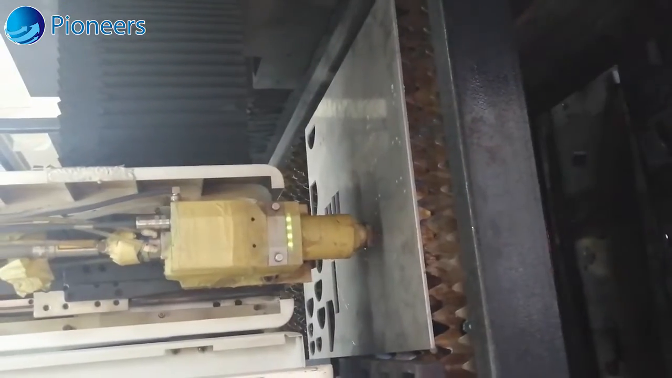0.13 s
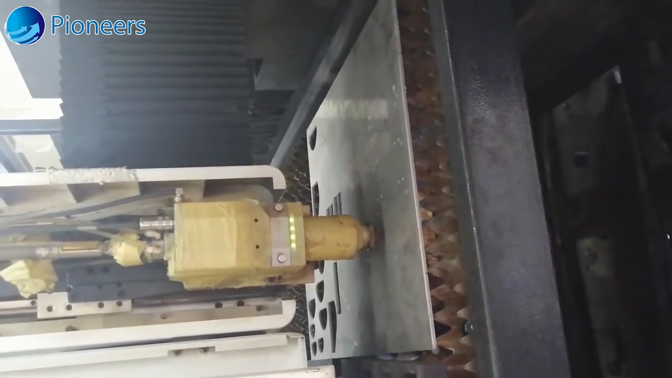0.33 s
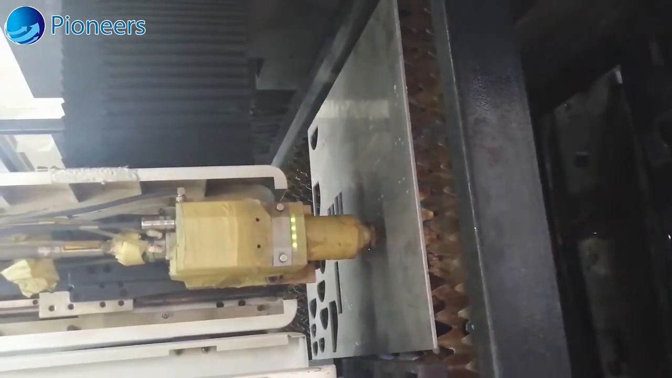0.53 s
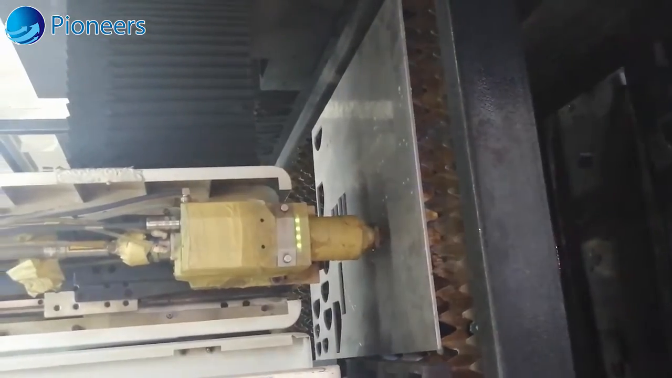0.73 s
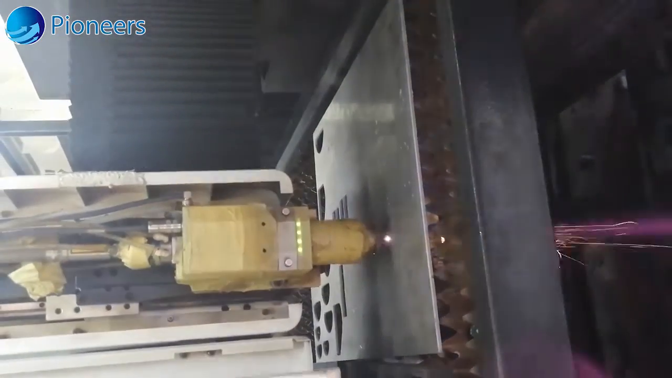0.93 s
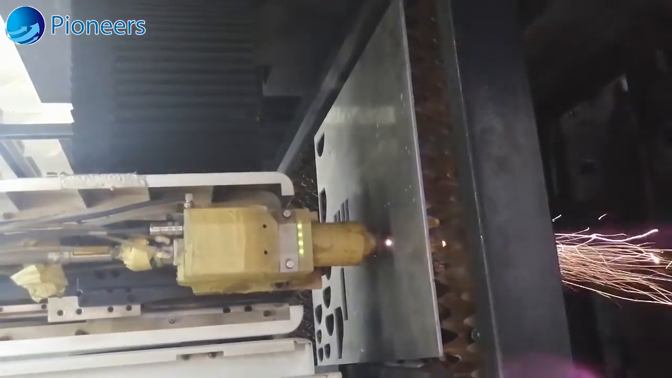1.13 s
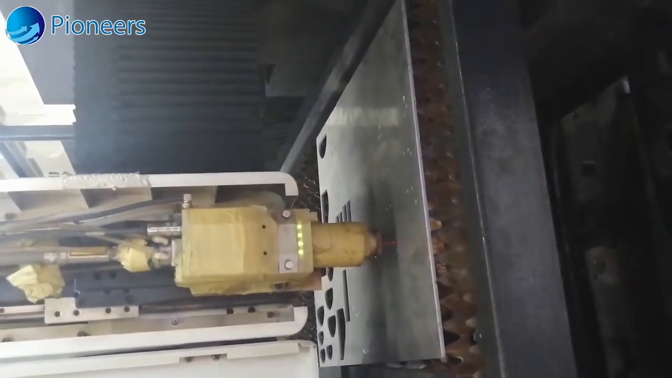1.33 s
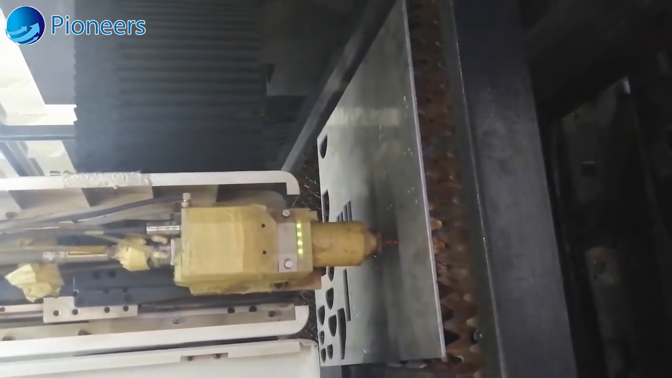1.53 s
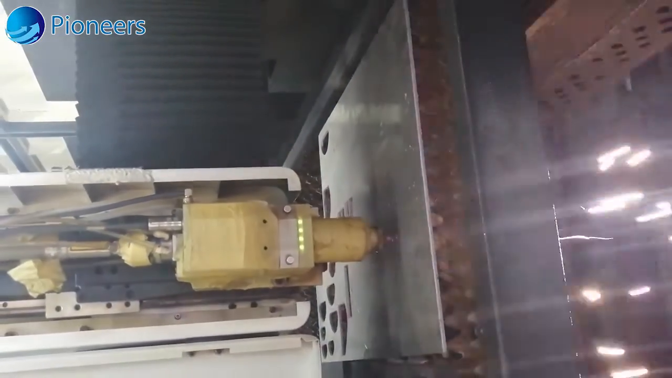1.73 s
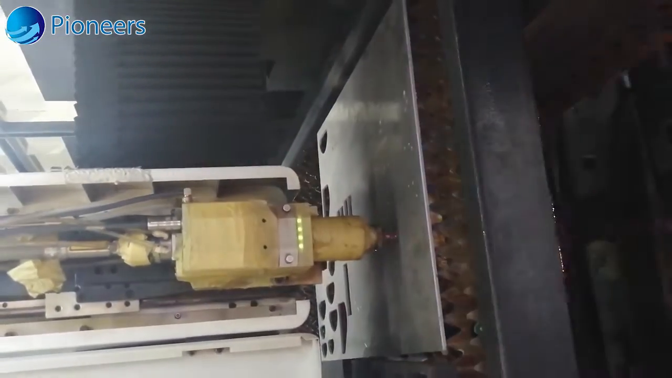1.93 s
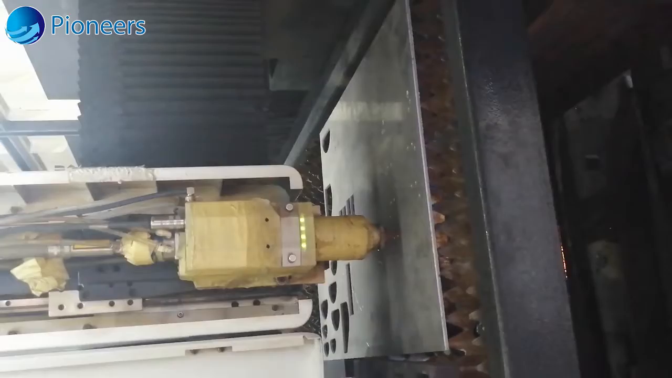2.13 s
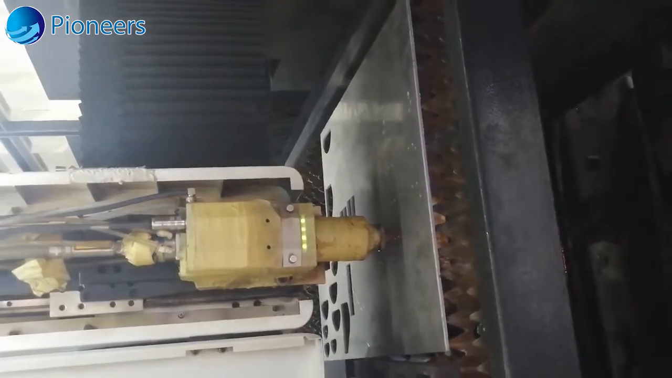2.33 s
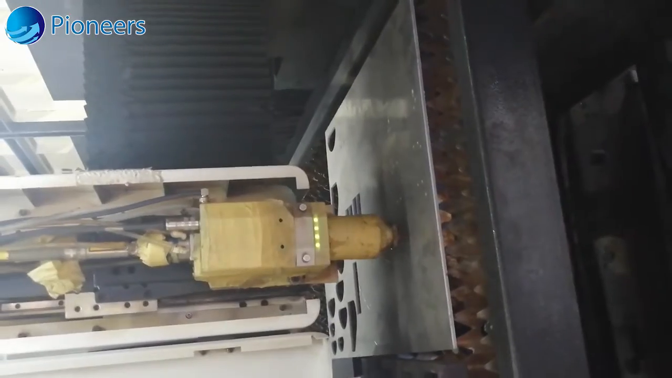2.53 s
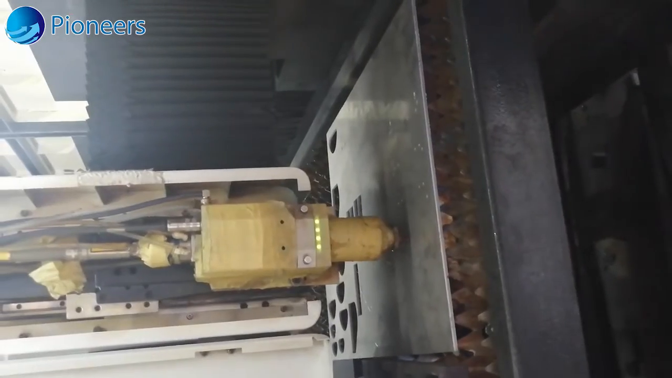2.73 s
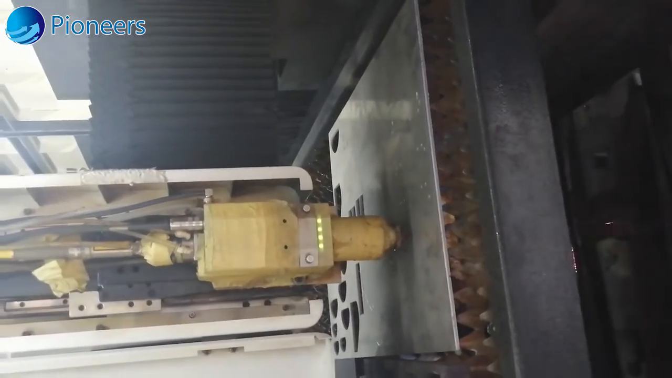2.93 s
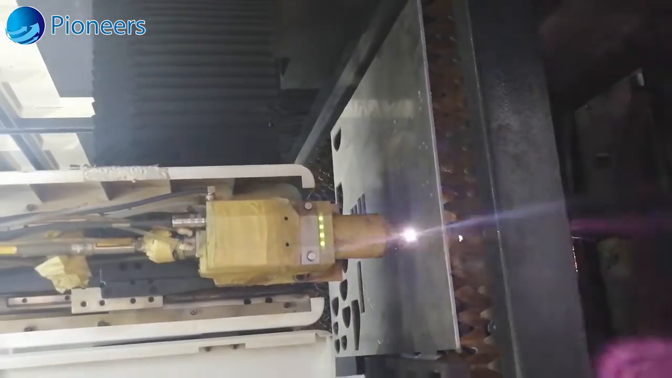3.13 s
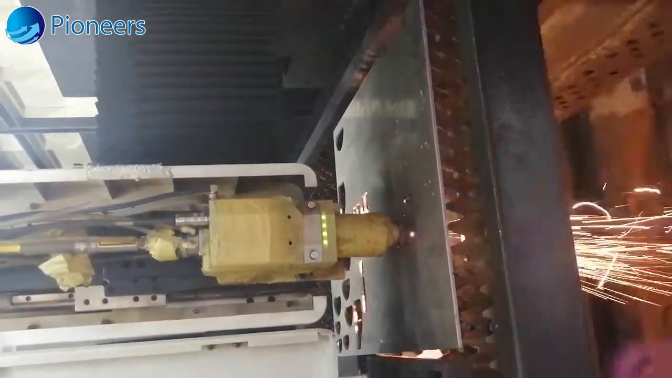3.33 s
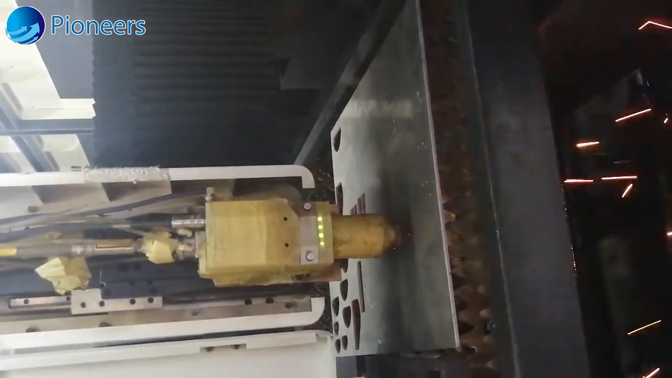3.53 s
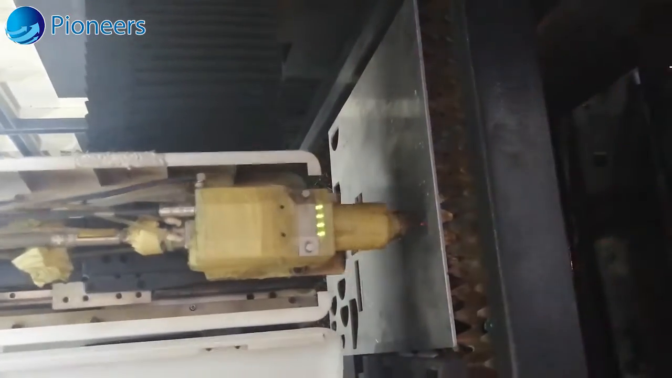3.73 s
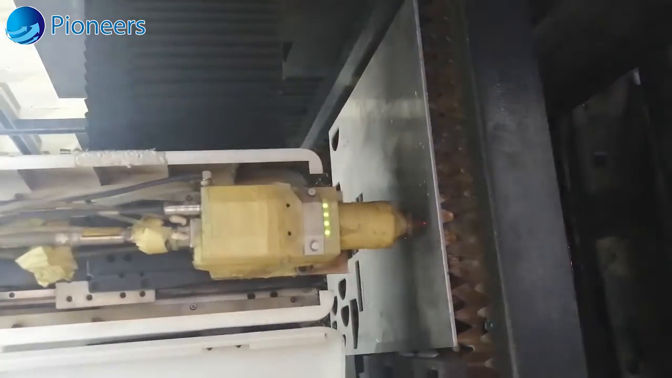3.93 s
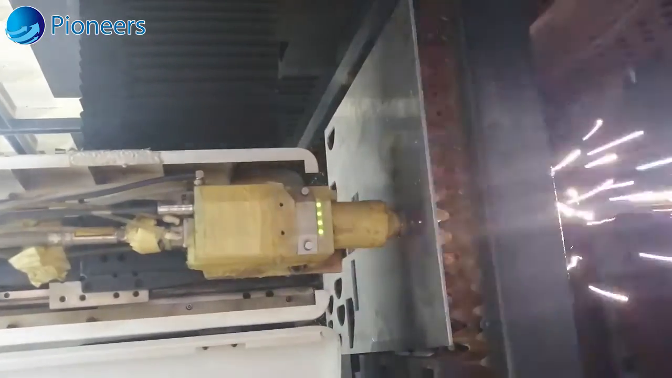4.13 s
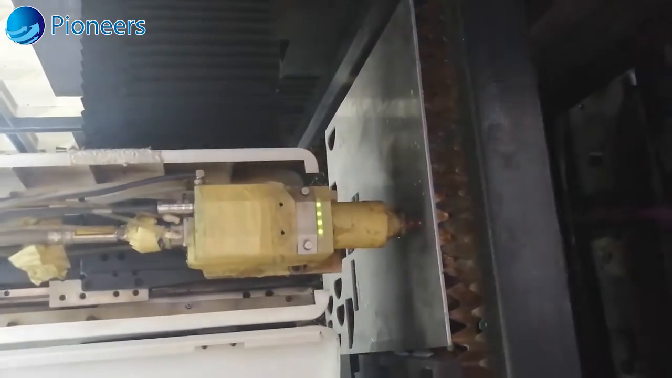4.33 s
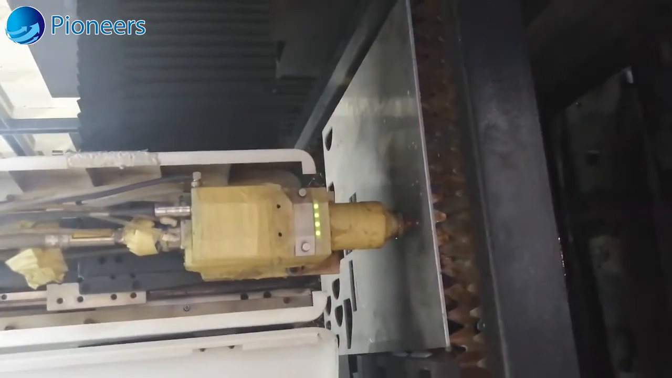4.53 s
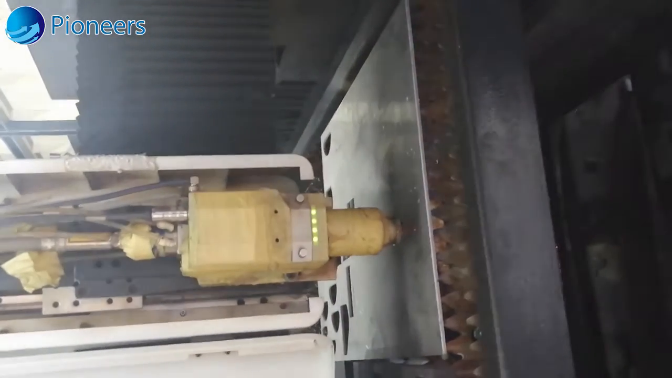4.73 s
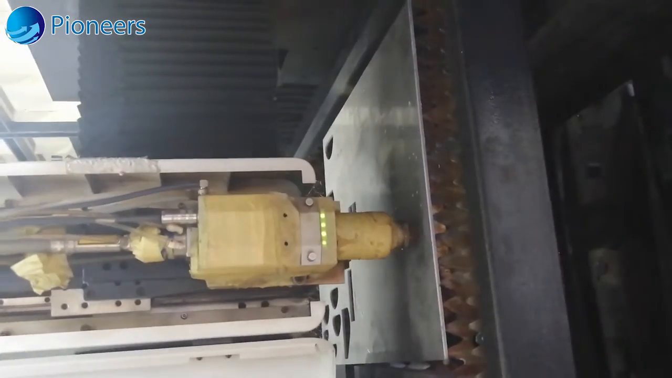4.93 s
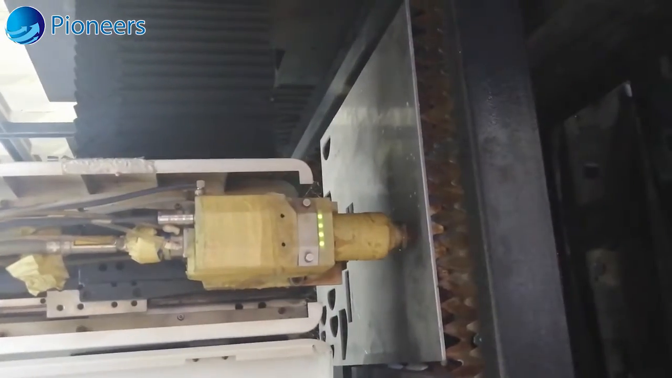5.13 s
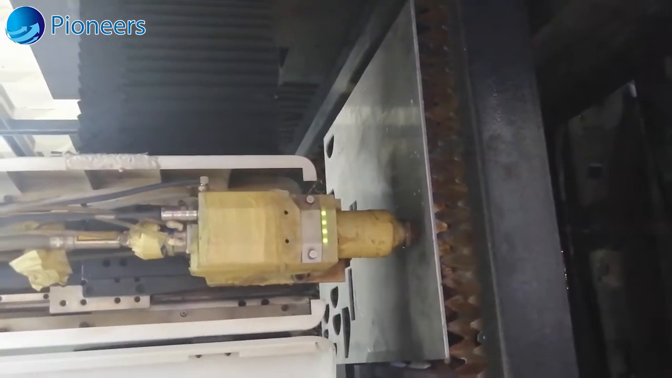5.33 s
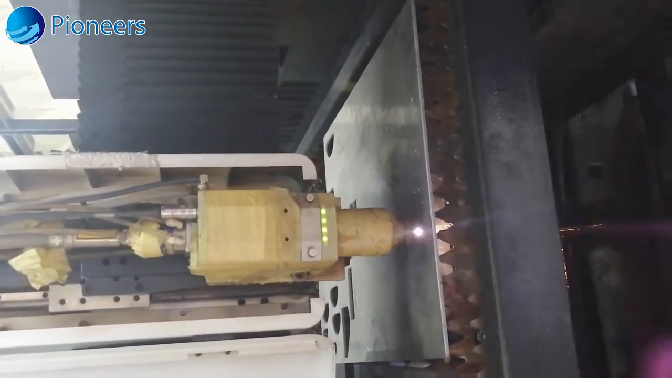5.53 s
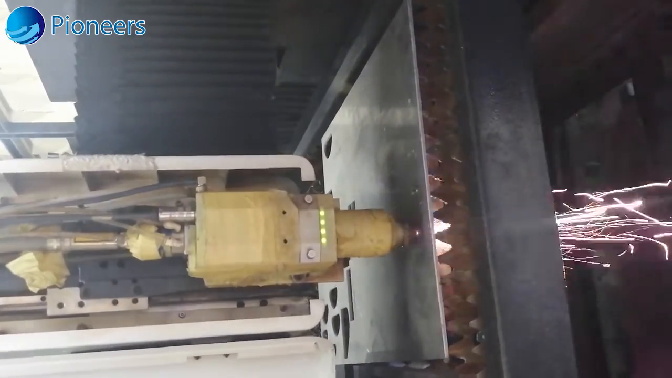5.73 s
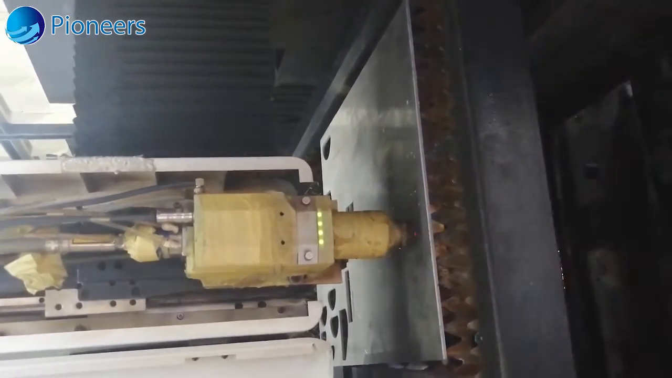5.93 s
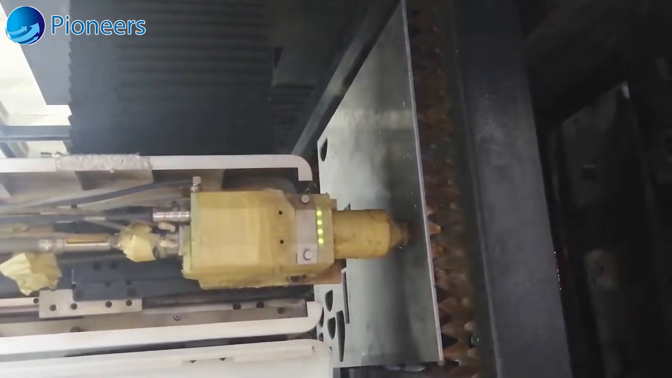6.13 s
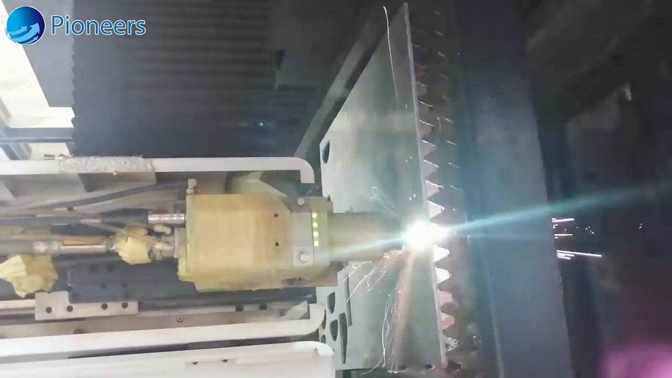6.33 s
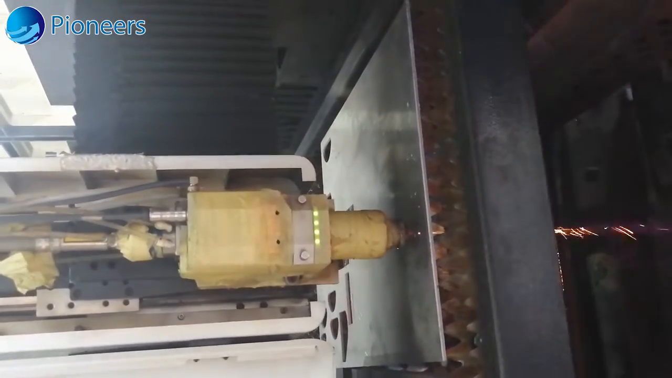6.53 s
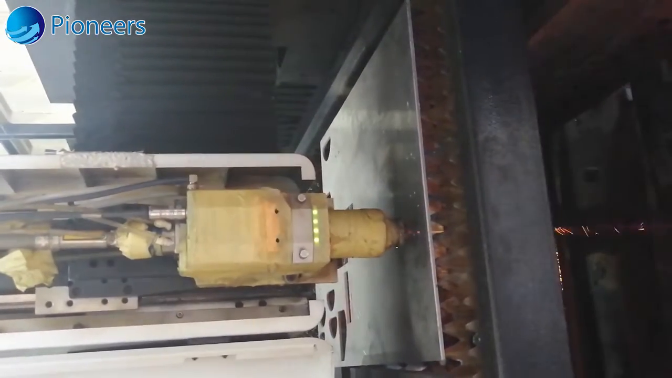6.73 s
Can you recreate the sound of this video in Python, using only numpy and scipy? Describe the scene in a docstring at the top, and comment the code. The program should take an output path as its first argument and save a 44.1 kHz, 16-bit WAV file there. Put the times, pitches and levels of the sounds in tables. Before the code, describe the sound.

Close stereo sound of a laser cutting steel sheet in a workshop: bright turbulent gas hiss, stronger on the right, over a low fan-like drone and faint hollow ringing. A sputtering cut is ending at the start; at 0.15 s the gas sinks, then returns by 0.3. Two sharp cracks about 0.09 s apart hit at 0.83 with a high fading whine. A mild blast at 1.2 clears the hole, the gas dips at 1.4, and from 1.5 the hissing cut sputters finely, with pops at 1.63, 2.04 and 2.2. The gas drops at 2.4 and returns; cracks and whine come at 3.08, the strongest, longest roar at 3.43-3.6, a dip at 3.75, then cutting from 3.9. It softens at 4.85, cracks and whines at 5.51, blasts at 5.87 with a tiny whine, dips at 6.1, and cuts from 6.2 to the end with hollow singing.

```python
"""A steady gas hiss, stronger on the right, over a low machine drone: a fibre laser cuts steel sheet, heard close by.
Three holes run the same cycle: the gas sinks as the head lifts and comes back as it hovers, a whine and two cracks
mark the pierce, a blast clears the hole, the gas dips briefly, and the cut runs on with a fine sputter and a few pops.
Hiss, drone and hollow rings are shaped noise; blasts and sputter are random pressure spikes over low noise;
the whine is three roughened harmonics of the laser's pulse rate."""
import sys
import numpy as np
from scipy import signal
from scipy.fft import rfft, irfft
from scipy.io import wavfile
from scipy.ndimage import uniform_filter1d

SR = 44100
rng = np.random.default_rng(int(sys.argv[2]) if len(sys.argv) > 2 else 0)


def master_out(mix):
    """Clip the mix to full scale and print it as 16-bit PCM to the path in sys.argv[1]."""
    frames = np.transpose(np.atleast_2d(mix))
    ceiling = np.clip(frames, -1, 1)
    pcm = np.round(ceiling * 32767).astype(np.int16)
    wavfile.write(sys.argv[1], SR, pcm)


N = 299439
TIME = np.arange(N) / SR  # s
FREQS = np.fft.rfftfreq(N, 1 / SR)  # Hz

# All table levels are relative: scene() trims each layer into the mix.
# The work cycle, one row a hole: lift_s, pierce_s, blast_start_s, blast_end_s, gas_shut_s, cut_s, blast_db,
# extra_hover_hiss_db, extra_raised_body_db, extra_cut_hiss_db, extra_cut_sputter_db
HOLES = [(0.14, 0.829, 1.189, 1.29, 1.383, 1.482, -33, 0, 0, -0.45, 2.5),
         (2.385, 3.083, 3.434, 3.585, 3.74, 3.914, -22.5, -1.6, 4, 0.25, -1),
         (4.85, 5.512, 5.873, 6.003, 6.1, 6.19, -30.5, 0.7, -0.6, 0.2, 0.2)]
# Gas and melt in each named stage: settling_s, hiss_db, body_over_hiss_db, bed_ring_db, sputter_db
STAGES = {"lift": (0.16, -49.5, 0.5, -58, -86), "hover": (0.055, -41.1, 1.66, -49.2, -85),
          "pierce": (0.02, -39.8, 3.7, -51, -85), "rest": (0.025, -43.4, 4.3, -50, -85),
          "blast": (0.031, -32.4, 0.3, -53, -60), "ease": (0.01, -40.4, 2.5, -53.5, -57),
          "shut": (0.19, -61.5, 2.5, -79, -130), "cut": (0.013, -37.6, 1.1, -51, -51.5)}
# Two cracks of every pierce and the weak roar between them: delay_s, length_s, level_db
CRACKS = [(0, 0.027, -24), (0.034, 0.048, -41), (0.087, 0.043, -24.5)]
# Crack outside that pattern: start_s, length_s, level_db
STRAY_CRACKS = [(3.146, 0.016, -28.5)]
# Bursts of the pulsed beam: start_s, length_s, whine_db, overtones_db
WHINES = [(0.829, 0.11, -35.5, -28.5), (3.082, 0.18, -30.8, -34), (5.513, 0.125, -30, -31.5),
          (5.866, 0.02, -34, -44)]
# Single pops of the melt: start_s, peak_db, width_s
POPS = [(1.343, -25.5, 0.00088), (1.3889, -16.5, 0.0012), (1.629, -21, 0.00069), (2.044, -18.5, 0.00077),
        (2.204, -16, 0.00051), (3.670, -26, 0.00061), (3.734, -24, .0007), (6.096, -30, .0012)]
# Hollow singing of gas in the kerf: start_s, end_s, level_db
KERF = [(3.47, 3.66, -43), (6.2, 6.9, -44)]
# Resonances of the kerf: centre_hz, width_hz, level_db
KERF_MODES = [(2470, 330, 1), (2760, 410, -7), (3250, 340, -3)]
# How strongly the jet stirs the hollow bed as the head moves along: time_s, level_db
BED = [(0, -6.5), (2.2, -7), (2.8, -2), (4.1, 2.1), (6.79, 1.2)]
# Resonances of the bed under the sheet: centre_hz, width_hz, level_db
BED_MODES = [(737, 62, -3.5), (910, 78, 1.5), (1068, 51, 2.5), (1220, 110, 1.5), (1735, 34, -2.5),
             (2120, 1300, -6)]
# Colour of the jet on either side: freq_hz, left_db_per_hz, right_db_per_hz
HISS = [(500, -39.5, -27), (1980, -24.5, -22.5), (3130, -20, -18), (3860, -21.5, -21.5), (4307, -23, -15.5),
        (5200, -14, -0.84), (6070, -15, 1), (7080, -9.5, -5.5), (8350, -7, -12), (9900, -12.5, -11),
        (12400, -14.5, -8), (13800, -19.5, -10.5), (14920, -12, 0.5), (15570, -23, -16)]
# Peaks and hollows that head and sheet give the hiss: centre_hz, width_hz, level_db
HISS_PEAKS = [(3920, 350, -1.5), (5350, 120, 1.5), (5610, 290, -2.5), (5790, 120, 3), (6080, 100, 2),
              (7700, 280, -2.5), (10050, 240, 4), (10750, 400, -1), (15800, 260, 5)]
# Colour of the machine drone: freq_hz, level_db_per_hz
DRONE = [(20, -10), (45, -4), (90, -2), (180, 2), (290, -6), (410, -2), (650, -7), (1050, -11.5),
         (1450, -17), (3000, -36), (6000, -23)]
# Wavering hum lines of the machine: pitch_hz, rms_db
HUM = [(47, -62.5), (419, -71.5), (1960, -70.5)]

LIFT_S, PIERCE_S = 0.13, 0.145  # length of the lift and of the pierce
BLAST_LEAD_S = 0.049  # the gas builds up before the blast
MELT_LAG_S = 0.02  # added to the settling time of the melt
# a harder blast hisses louder and thinner (shares in dB per dB above the usual blast)
USUAL_BLAST_DB, BLAST_HISS_SHARE, BLAST_BODY_SHARE = -28.5, 0.33, -0.17
PULSE_HZ = 5000  # pulse rate of the beam, the pitch of the whine
WHINE_FADE_DB_PER_S, OVERTONE_FADE_DB_PER_S = 47, 60
THIRD_DB = -3  # third harmonic against the second
BODY_TOP_HZ = 7400  # splits the hiss into body and top
EDGE_HZ = 15790  # upper band limit of the recorder


def amp(db):
    """Decibels to gain."""
    return 10 ** (np.asarray(db) / 20)


def unit(x):
    """Scales to rms 1, over both sides together."""
    return x / np.sqrt(np.mean(abs(x) ** 2) + 1e-20)


def read(hz, values, at=FREQS):
    """Joins spectrum points by straight lines on a log-frequency axis."""
    return np.interp(np.log(at + 1), np.log(np.asarray(hz) + 1), values)


def noise(gain):
    """Noise of the given spectrum, unrelated on the two sides."""
    white = rng.standard_normal((2, N))
    return unit(irfft(rfft(white) * gain, N))


def wobble(rate_hz):
    """Smooth random drift on each side, up to about the given rate."""
    return noise(1 / (1 + (FREQS / rate_hz) ** 4))


def since(start):
    """Seconds gone by since a moment, zero before it."""
    return np.maximum(TIME - start, 0)


def fade_in(start, edge):
    """Straight ramp from 0 to 1, centred on the start."""
    return np.clip((TIME - start) / edge + .5, 0, 1)


def gate(start, end, edge):
    """Opens and shuts with soft edges."""
    return fade_in(start, edge) * np.clip((end - TIME) / edge + .5, 0, 1)


def bursts(rows, attack, release):
    """Level of bursts (start_s, length_s, level_db): each starts hard, holds and dies quickly."""
    return sum(amp(db) * fade_in(start, attack) * np.exp(-since(start + length) / release)
               for start, length, db in rows)


def resonances(modes):
    """Spectrum of a few resonances, each a bell-shaped peak."""
    return sum(amp(db) / (1 + ((FREQS - hz) / (width / 2)) ** 2) for hz, width, db in modes)


def to_right(left_db):
    """Gains of a source that is weaker on the left."""
    return amp([[left_db], [0]])


def recoil(x, corner_hz):
    """A high-pass: each push of pressure is followed by a slow shallow suction."""
    b, a = signal.butter(1, corner_hz, "high", fs=SR)
    return signal.lfilter(b, a, x)


def spikes(per_s, spread_db, width, corner_hz):
    """Random one-sided pressure spikes of very unequal size, at per_s for each of three widths (s)."""
    x = np.zeros((2, N))
    for span in (width / 2, width, width * 2):
        struck = rng.random((2, N)) < per_s / SR
        size = amp(spread_db * np.minimum(rng.standard_normal((2, N)), 2)) * struck
        u = np.arange(-64, 65) / (span * SR)  # time in spike widths
        shape = unit(np.cos(np.pi * np.clip(u, -.5, .5)) ** 2)
        x += signal.oaconvolve(size, shape[None], "same")
    return unit(recoil(x - x.mean(), corner_hz))


def machine(drone_db, hum_db):
    """Extraction fan and drives: a low drone of shaped noise with faint wavering lines."""
    drone = noise(amp(read(*np.transpose(DRONE))))
    drone = unit(drone + .5 * drone[::-1])  # each side shares some of the other
    hum = sum(amp(db) * unit(np.sin(2 * np.pi * hz * TIME + wobble(rate_hz=4.8))) for hz, db in HUM)
    return amp(drone_db) * drone * to_right(left_db=-3.0) + amp(hum_db) * hum


def cavity(level, modes, left_db):
    """Gas blown through a hollow rings in a few broad resonances."""
    return level * noise(resonances(modes)) * to_right(left_db)


def bed_ring(stir):
    """The jet stirs the hollow bed under the sheet, following the gas and the place of the head."""
    place = amp(np.interp(TIME, *np.transpose(BED)))
    return cavity(stir * place, BED_MODES, left_db=-3.5)


def kerf_ring():
    """Gas sings hollowly in the kerf, swelling in and out softly."""
    level = sum(amp(db) * gate(start, end, edge=0.19) for start, end, db in KERF)
    return cavity(level, KERF_MODES, left_db=-3.0)


def work_cycle():
    """Gains of hiss, body, bed and sputter: a cut is under way at first, then each stage settles to its levels."""
    levels = np.array(STAGES["cut"][1:])[:, None] * np.ones(N)
    lag = np.array([0, 0, 0, MELT_LAG_S])[:, None]
    for lift, pierce, blast, blast_end, shut, cut, blast_db, hover_db, body_db, cut_db, melt_db in HOLES:
        push_db = blast_db - USUAL_BLAST_DB
        # stage, start_s, extra hiss, body and sputter in dB
        for stage, start, more_hiss, more_body, more_melt in [
                ("lift", lift, 0, body_db / 2, 0),
                ("hover", lift + LIFT_S, hover_db, body_db, 0),
                ("pierce", pierce, 0, body_db / 2, 0),
                ("rest", pierce + PIERCE_S, 0, body_db / 2, 0),
                ("blast", blast - BLAST_LEAD_S, BLAST_HISS_SHARE * push_db, BLAST_BODY_SHARE * push_db, 0),
                ("ease", blast_end, 0, 0, 0),
                ("shut", shut, 0, 0, 0),
                ("cut", cut, cut_db, 0, melt_db)]:
            settle, hiss, body, bed, melt = STAGES[stage]
            goal = np.array([hiss + more_hiss, body + more_body, bed, melt + more_melt])[:, None]
            levels = goal + (levels - goal) * np.exp(-since(start) / (settle + lag))
    return amp(levels)


def cracks():
    """Lists the cracks of all pierces: start_s, length_s, level_db."""
    pierced = [(pierce + delay, length, db) for _, pierce, *_ in HOLES for delay, length, db in CRACKS]
    return pierced + STRAY_CRACKS


def jet_noise(patchy_db, flicker_db, likeness):
    """Turbulent hiss whose colour drifts in smooth random patches of pitch and time."""
    frames, hz = N // 512 + 5, np.fft.rfftfreq(2048, 1 / SR)
    shape = (2, frames, len(hz))
    z = rng.standard_normal(shape) + 1j * rng.standard_normal(shape)
    likeness = np.clip(likeness, 0, 1)  # how alike the two sides are
    z[0] = likeness * z[1] + np.sqrt(1 - likeness ** 2) * z[0]
    patches = uniform_filter1d(rng.standard_normal(shape), size=36, axis=1)  # smooth in time
    patches = unit(uniform_filter1d(patches, size=3, axis=2))  # and in frequency
    points, left, right = np.transpose(HISS)
    colour_db = np.array([read(points, left, hz), read(points, right, hz)])[:, None]
    peaks_db = sum(db / (1 + ((hz - centre) / (width / 2)) ** 2) for centre, width, db in HISS_PEAKS)
    z = z * amp(colour_db + peaks_db + patchy_db * patches)
    x = signal.istft(z.swapaxes(1, 2), nperseg=2048, noverlap=1536)[1][:, :N]
    return unit(x * amp(flicker_db * wobble(rate_hz=180)))


def gas_jet(flow, body, level_db, body_db, flare_db, flare_body_db, flash_db, flash_s):
    """The hiss follows the gas flow and flares with each crack; its top flashes as each beam burst strikes."""
    flare = bursts(cracks(), attack=0.006, release=0.016)
    strikes = [(start, 0, overtone_db + flash_db) for start, _, _, overtone_db in WHINES]
    flash = bursts(strikes, attack=0.003, release=flash_s)
    hiss = jet_noise(patchy_db=2.5, flicker_db=0.45, likeness=0.11)
    low = irfft(rfft(hiss) / (1 + (FREQS / BODY_TOP_HZ) ** 12), N)
    top_level = np.hypot(flow, amp(flare_db) * flare + flash)
    body_level = np.hypot(flow * body * amp(body_db), amp(flare_body_db) * flare)
    return amp(level_db) * (top_level * (hiss - low) + body_level * low)


def sputter(melt, level_db, rumble_db, puffy_db):
    """While the beam travels, the melt spits in uneven puffs of separate small spikes over a soft flutter."""
    puffs = unit(amp(puffy_db * wobble(rate_hz=12)))
    spits = spikes(per_s=450, spread_db=6.5, width=0.00032, corner_hz=45) * to_right(left_db=-26)
    flutter = amp(rumble_db) * noise(resonances([(50, 140, 0)])) * to_right(left_db=-20)
    return amp(level_db) * melt * puffs * (spits + flutter)


def pops(level_db):
    """Larger drops of melt burst one by one, each a single rounded push of pressure."""
    x = sum(amp(db) * np.sin(np.pi * np.clip((TIME - start) / width, 0, 1)) ** 2 for start, db, width in POPS)
    return amp(level_db) * recoil(x, corner_hz=90) * to_right(left_db=-50)


def blasts(level_db, ring_db, rumble_db, release, lumpy_db):
    """Gas breaks through the melt: spikes crowd into a lumpy roar with a low rumble and a ring of the fresh hole."""
    clearing = [(start, end - start, db) for _, _, start, end, _, _, db, *_ in HOLES]
    swell = bursts(cracks(), attack=0.0045, release=release) + bursts(clearing, attack=0.026, release=0.013)
    lumps = unit(amp(lumpy_db * wobble(rate_hz=52)))
    crowd = spikes(per_s=2500, spread_db=3.5, width=0.00037, corner_hz=151) * to_right(left_db=-18)
    ring = amp(ring_db) * noise(resonances([(2920, 1100, 0)])) * to_right(left_db=-18)
    # the rumble differs less than the roar between weak and hard blasts
    rumble_level = amp(rumble_db) * np.tanh(swell / amp(-30))
    rumble = rumble_level * noise(resonances([(49.6, 280, 0)])) * to_right(left_db=-9.5)
    roar = amp(level_db) * swell * crowd
    return lumps * (roar + rumble) + amp(level_db) * swell * ring


def pierce_whine(level_db, rough, rasp_db, between_db):
    """Each laser pulse puffs off vapour: a fading whine, brightest in the cracks, scattered by the turbulent jet."""
    first, overtones, tones = np.zeros(N), np.zeros(N), np.zeros((2, N))
    for start, length, whine_db, overtone_db in WHINES:
        beam = gate(start, start + length, edge=.008)
        first += beam * amp(whine_db - WHINE_FADE_DB_PER_S * since(start))
        overtones += beam * amp(overtone_db - OVERTONE_FADE_DB_PER_S * since(start))
    cracking = bursts(cracks(), attack=0.004, release=0.0094)
    overtones *= np.maximum(cracking / cracking.max(), amp(between_db))
    for k, level in enumerate([first, overtones, overtones * amp(THIRD_DB)], start=1):
        scatter = 1 + rough * (wobble(rate_hz=260) + 1j * wobble(rate_hz=130))
        harmonic = np.exp(2j * np.pi * k * PULSE_HZ * TIME)
        tones += level * unit((scatter * harmonic).real)
    # uneven puffs also ring a broad band just above the pulse rate
    rasp = amp(rasp_db) * first * noise(resonances([(5220, 550, 0)]))
    return amp(level_db) * (tones + rasp) * to_right(left_db=-16.0)


def scene():
    """Mixes all sources, left and right."""
    flow, body, stir, melt = work_cycle()
    background = machine(drone_db=-58.5, hum_db=-2.5) + bed_ring(stir) + kerf_ring()
    jet = gas_jet(flow, body, level_db=9.0, body_db=-1.0, flare_db=-11.3, flare_body_db=-19,
                  flash_db=-4, flash_s=0.017)
    cutting = sputter(melt, level_db=9.0, rumble_db=-12.5, puffy_db=0.9) + pops(level_db=-1.5)
    piercing = blasts(level_db=-2, ring_db=-7.5, rumble_db=-33, release=0.0081, lumpy_db=2)
    whine = pierce_whine(level_db=5.4, rough=0.55, rasp_db=-0.7, between_db=-9)
    return background + jet + cutting + piercing + whine


def record(dry):
    """The microphone rounds off the hardest peaks; then the recorder's steep band limit."""
    ceiling = .4  # full scale is 1
    rounded = ceiling * np.tanh(dry / ceiling)
    band_limit = signal.firwin(511, EDGE_HZ, window=("kaiser", 9), fs=SR)
    return signal.oaconvolve(rounded, band_limit[None], "same")


dry = scene()
out = record(dry)
master_out(out)
```